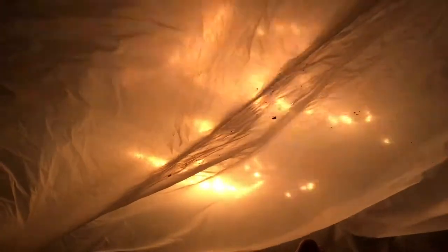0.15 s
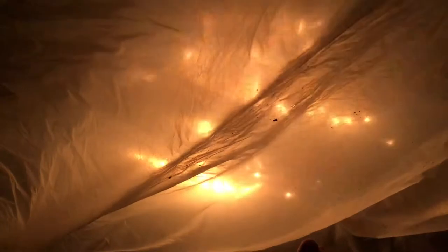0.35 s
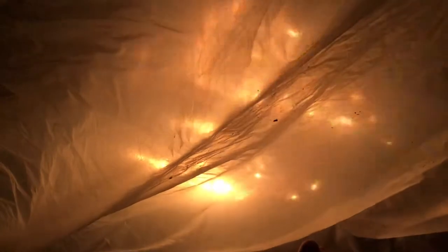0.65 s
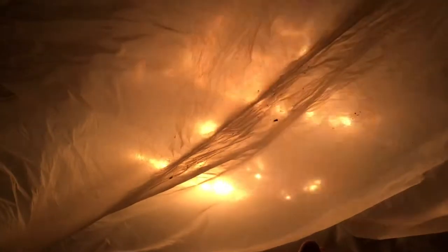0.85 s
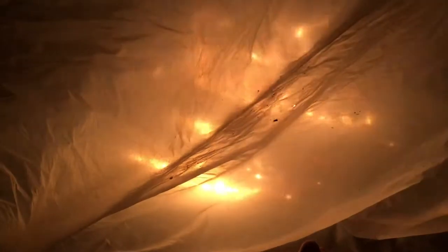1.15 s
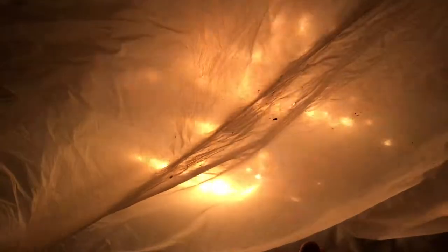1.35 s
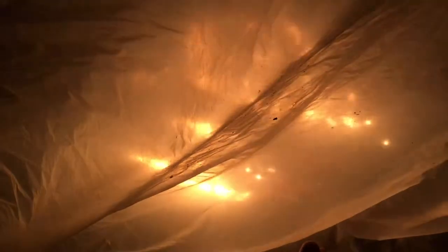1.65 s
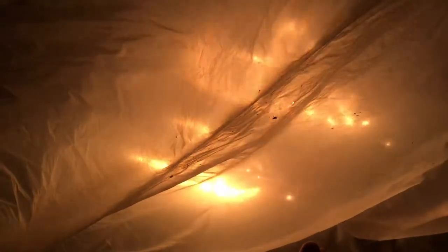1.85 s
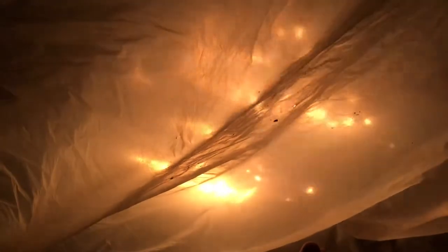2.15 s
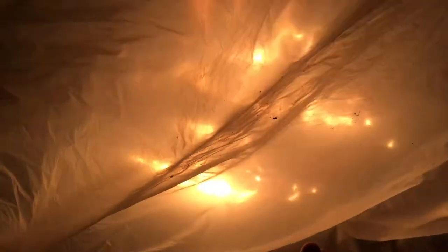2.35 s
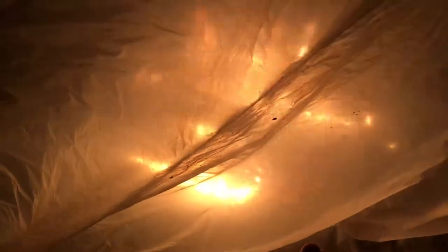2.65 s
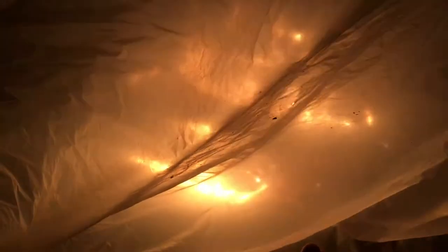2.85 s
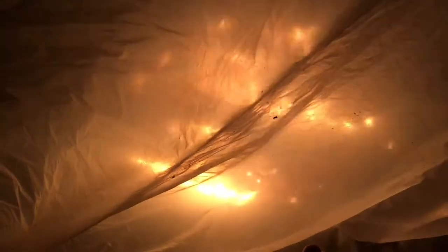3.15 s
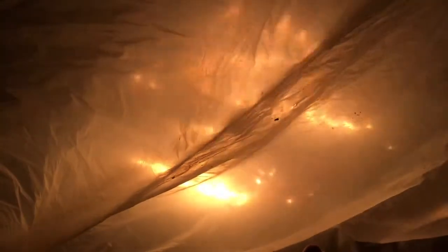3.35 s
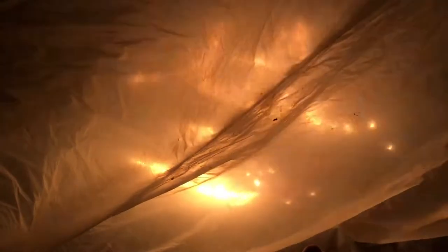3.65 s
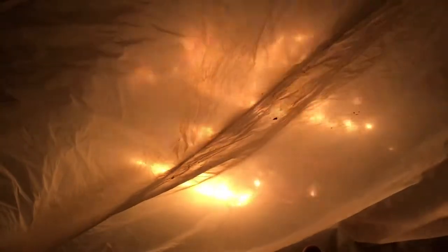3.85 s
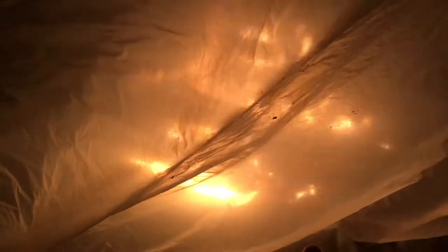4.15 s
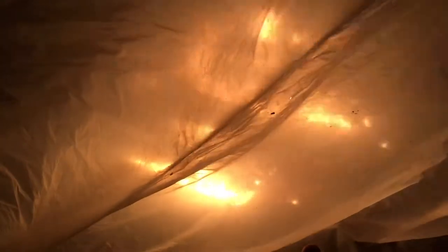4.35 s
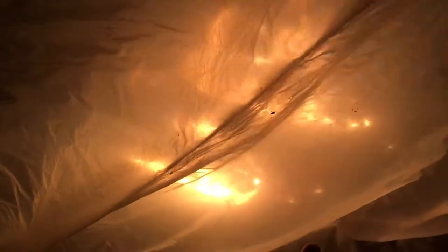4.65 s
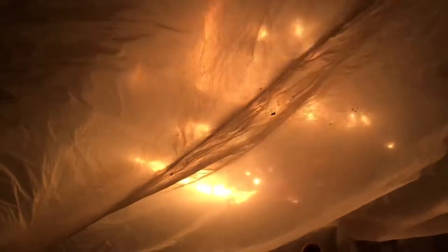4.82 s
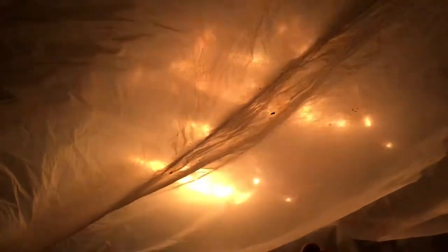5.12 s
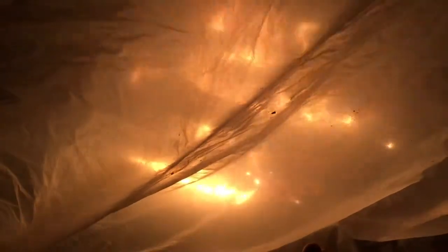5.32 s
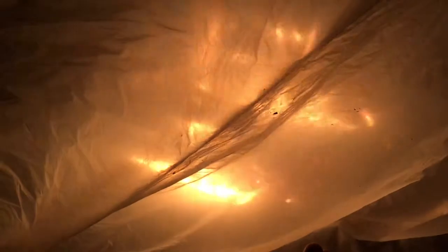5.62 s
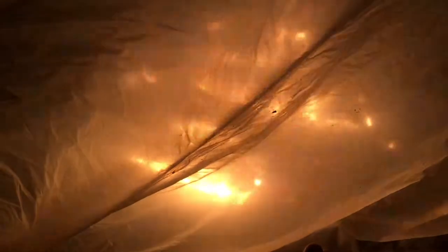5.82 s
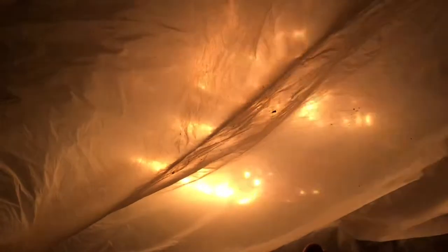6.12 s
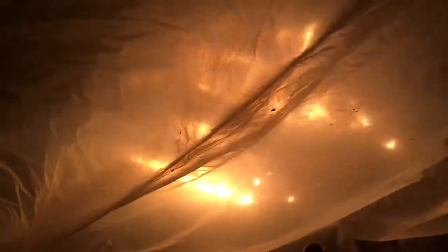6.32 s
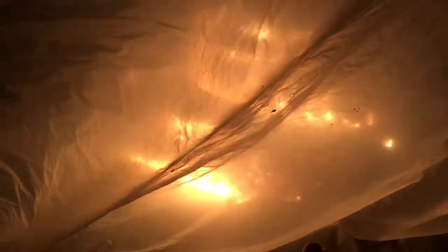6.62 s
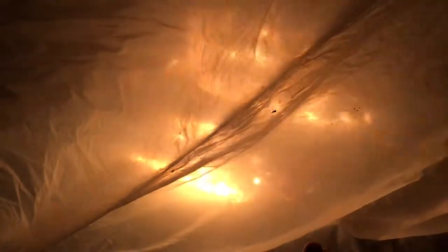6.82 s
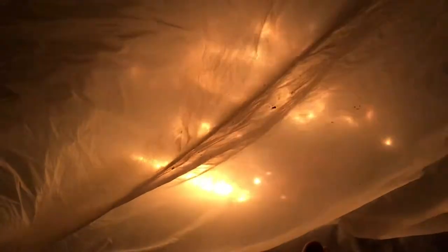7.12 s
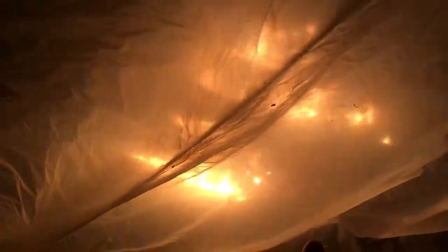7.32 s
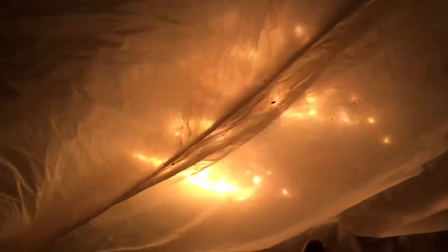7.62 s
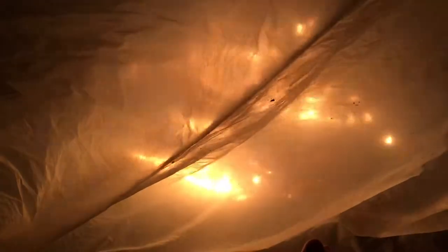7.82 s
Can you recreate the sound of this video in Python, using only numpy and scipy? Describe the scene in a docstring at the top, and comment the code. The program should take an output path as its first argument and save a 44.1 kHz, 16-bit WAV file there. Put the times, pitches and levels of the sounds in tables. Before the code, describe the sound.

Steady rain beats on loose plastic overhead, a low muffled drumming under light patter and spray. Beside it a wood fire gives tiny ticks, two bright snaps in the first three seconds, a duller one around five, then a burst of hard cracks between six and just past seven seconds. Heavy drops thud briefly. Close microphone under the sheet, outdoors, with hardly any echo.

```python
"""Hard, steady rain on a slack plastic sheet, heard from underneath: random impacts drum low,
drops ring short patches of sheet as patter, dense impulses hiss as spray, and heavy drops slap.
A wood fire close by ticks and now and then pops sharply: filtered snaps with noise debris.
The shelter answers pops and heavy drops briefly, by convolution with decaying noise."""
import sys
import numpy as np
from scipy import signal
from scipy.fft import rfft, irfft
from scipy.io import wavfile
from scipy.ndimage import map_coordinates

SR = 44100
rng = np.random.default_rng(int(sys.argv[2]) if len(sys.argv) > 2 else 0)


def pcm_store(signal):
    """Save signal as 16-bit PCM."""
    levels = np.round(np.clip(np.atleast_2d(signal), -1, 1) * 32767)
    wavfile.write(sys.argv[1], SR, levels.astype(np.int16).T)


N = 351477  # length [samples]

# Strength of the rain, before the trims in rain():
# (time [s], drumming level [dB], patter and spray level [dB])
RAIN_STRENGTH = [(0.0, -47.5, -56.5), (1.13, -48, -57), (1.24, -48.5, -55.5), (2.66, -47.5, -56.5),
                 (3.35, -50, -56.5), (3.93, -46.5, -56), (4.95, -48.5, -57), (5.37, -48.5, -56),
                 (6.44, -48, -56.5), (7.97, -48.5, -56.5)]
# Drumming of the slack sheet, relative: (frequency [Hz], gain [dB])
DRUM_SPECTRUM = [(15, -62.5), (25, -39.5), (32, -20.5), (41, -8.5), (61, 0.5), (110, 1.5), (190, -1),
                 (270, -5), (305, -7), (340, -16), (395, -10), (480, -18.5), (700, -41.5), (1500, -53)]
# Patter of drops on plastic, relative: (frequency [Hz], gain [dB])
PATTER_SPECTRUM = [(30, -55.5), (150, -25.5), (400, -1), (600, -2), (1150, 2.5), (2200, -2), (3500, -7.5),
                   (6000, -19.5), (10000, -39), (16000, -26)]
# Fine spray and distant rain, relative: (frequency [Hz], gain [dB])
SPRAY_SPECTRUM = [(30, -55.5), (200, -12), (600, 8), (2000, 2), (4000, -4), (6000, -10), (9000, -14),
                  (11500, -19), (14400, -17.5), (16000, -29.5)]
# Thin ticks of the embers, relative: (frequency [Hz], gain [dB])
EMBER_SPECTRUM = [(100, -53.0), (1000, -15.0), (4000, 5.0), (9000, 2.5), (15000, 0.0)]
# Pops of the fire, from sharp bursts to small ticks: (time [s], relative level [dB],
# ring [Hz], slope above the ring [dB per octave], sizzle at the very top [dB])
FIRE_POPS = [(0.2728, -21, 1530, -0.5, -10), (0.575, -30.5, 3100, 0, -4), (0.8852, -32, 4700, 3, -6),
             (1.211, -20, 2200, 0, -9), (1.3907, -28, 5000, 0, 10), (1.7582, 2.5, 3130, -4.5, 4.5),
             (2.7532, -3, 2110, -4.5, 16.5), (3.1671, -35, 8500, -4.5, -5), (3.366, -33, 4300, -5, 12),
             (3.5501, -24, 6100, -6, 5), (3.6622, -26, 4000, -3, -13), (3.8234, -33.5, 9000, -1.5, 7),
             (4.448, -24.5, 5800, -3, -4), (4.4606, -20.5, 2300, -3, -3), (4.818, -28.5, 4100, 0, 5),
             (5.0123, -33.5, 10400, -3.5, -4), (5.2078, -9.3, 2150, -10, 0), (6.352, 9, 5170, -0.2, 0),
             (6.4624, -2.2, 3100, -3, 1.5), (6.6156, -23.5, 1520, -4, 4), (6.7198, -25, 2600, -2, 7),
             (6.9716, 5, 1770, -3, 6), (7.1847, 3, 2860, 0, -6)]
# Colour common to all pops, relative: (frequency [Hz], gain [dB])
POP_SPECTRUM = [(100, -9.5), (300, -0.5), (800, 2.5), (1300, -2), (1800, 2.5), (3100, 4.5), (3900, 2),
                (5000, 3.5), (6400, -0.5), (9000, 1), (11500, -4), (14500, 1.5), (16000, -18.5)]
# Treble splinters and scatters most: (frequency [Hz], debris gain [dB])
DEBRIS_SPECTRUM = [(700, -5.5), (2300, -6.5), (5600, -0.5), (12000, 1.0)]
# Decay of the shelter's answer: (frequency [Hz], time to fall 60 dB [s])
SHELTER_DECAY = [(200, 0.099), (2000, .16), (8000, 0.21), (16000, 0.094)]
# Heavy drops on the sheet: (time [s], energy [dB])
HEAVY_DROPS = [(0.44, -25.5), (0.853, -22), (1.0915, -11), (1.095, -15.5), (1.3484, -17), (1.8629, -22),
               (1.9793, -24.5), (3.7529, -22), (4.177, -22), (5.3505, -26), (5.4964, -21.5),
               (5.5512, -23.5), (5.7218, -22.5), (6.2283, -21), (7.5433, -26.5), (7.7574, -21.5)]
# Slap that all heavy drops share, relative: (frequency [Hz], gain [dB])
SLAP_SPECTRUM = [(60, -9), (280, 0.5), (800, 1), (2600, -5), (5500, -19.5), (8000, -24), (14000, -39)]

# Pockets ringing above this pitch are too small to give much bass;
# the thinning is in dB per octave, for each octave the pitch is higher
SMALL_POCKET_HZ, THINNING_DB = 2920, 11
SIZZLE_HZ = 10850  # where the sizzle begins
TOP_HZ = 16200  # upper band limit


def amp(db):
    """Level law: decibels to amplitude gain."""
    return 10 ** (np.asarray(db) / 20)


def unit(x):
    """Normalisation: x at rms 1."""
    return x / np.sqrt(np.mean(x ** 2) + 1e-20)


def along(points, hz):
    """Logarithmic frequency scale: (Hz, value) points joined linearly on it."""
    f, v = np.transpose(points)
    return np.interp(np.log(hz + 1), np.log(f + 1), v)


def curves(rows):
    """Linear interpolation: one value per sample for each column after the time."""
    s, *cols = np.transpose(rows)
    return [np.interp(np.arange(N) / SR, s, c) for c in cols]


def wobble(rate):
    """Band-limited fluctuation: a smooth random curve with rate knots a second."""
    knots = rng.standard_normal(int(N * rate / SR) + 4)
    return map_coordinates(knots, [np.arange(N) * rate / SR])


def causal(log_gain):
    """Minimum phase by folding the cepstrum: causal response with this natural-log gain."""
    cepstrum = irfft(log_gain)
    half = len(cepstrum) // 2
    cepstrum[1:half] *= 2
    cepstrum[half + 1:] = 0
    return np.exp(rfft(cepstrum))


def response(shape_db):
    """Energy normalisation: the causal response of energy 1 with this dB shape on the FFT grid."""
    return causal(np.log(unit(amp(shape_db))))


def coloured(x, spectrum):
    """Linear filtering: x through a causal filter with the (Hz, dB) spectrum, at rms 1."""
    hz = np.fft.rfftfreq(8192, 1 / SR)
    kernel = irfft(causal(np.log(amp(along(spectrum, hz)))))
    return unit(signal.fftconvolve(x, kernel)[:N])


def burst(envelope):
    """Transient noise: random samples under an envelope, with energy 1."""
    x = envelope * rng.standard_normal(len(envelope))
    return x / np.linalg.norm(x)


def add(track, s, x):
    """Superposition: mix x into the track from time s [s] on."""
    part = track[max(0, round(s * SR)):][:len(x)]
    part += x[:len(part)]


def impacts(rate, spread_db):
    """Shot noise: blows at random times, rate a second, of capped log-normal size."""
    size_db = spread_db * np.minimum(rng.standard_normal(N), 2)
    return (rng.random(N) < rate / SR) * amp(size_db) * rng.choice([-1, 1], N)


def splats(rate, spread_db, cycles, splash_t60, splash_db, count=5):
    """Modal excitation: each blow rings a few short random modes, then splashes as decaying noise."""
    blows = impacts(rate, spread_db)
    at = np.flatnonzero(blows)
    t = np.arange(SR // 150) / SR
    low_hz, high_hz = 450, 11000
    ring = np.zeros((len(at), len(t)))
    for k in range(count):
        chance = rng.random((len(at), 2))
        hz = low_hz * (high_hz / low_hz) ** ((k + chance[:, :1]) / count)
        # high modes die sooner and start stronger
        strength = chance[:, 1:] * hz
        ring += strength * np.sin(2 * np.pi * hz * t) * np.exp(-hz * t / cycles)
    ring *= blows[at, None]
    positions = at[:, None] + np.arange(len(t))
    rings = np.bincount(positions.ravel(), ring.ravel(), N)[:N]
    fade = amp(-60 * np.arange(SR // 10) / SR / splash_t60)
    # the energies of overlapping splashes add
    splash_energy = np.abs(signal.fftconvolve(blows ** 2, fade ** 2)[:N])
    splash = np.sqrt(splash_energy) * rng.standard_normal(N)
    return unit(rings) + amp(splash_db) * unit(splash)


def rain():
    """Superposed random impacts: drops push the slack sheet, slap its surface and break into spray."""
    drum_db, patter_db = curves(RAIN_STRENGTH)
    flurry = wobble(7.7)  # shared by drumming and patter
    pushes = impacts(rate=900, spread_db=3)
    drum = amp(drum_db + 1.5 + .5 * flurry) * coloured(pushes, DRUM_SPECTRUM)
    slaps = splats(rate=400, spread_db=5, cycles=2.6, splash_t60=.05, splash_db=-1)
    patter = amp(patter_db - 1.3 + 0.33 * flurry) * coloured(slaps, PATTER_SPECTRUM)
    fizz = impacts(rate=6000, spread_db=0)
    spray = amp(patter_db - 3.0 + 1.5 * wobble(12)) * coloured(fizz, SPRAY_SPECTRUM)
    return drum + patter + spray


def embers():
    """Sparse modal excitation: faint thin ticks of the embers between the pops."""
    ticks = splats(rate=18, spread_db=3.3, cycles=2, splash_t60=.04, splash_db=0)
    return amp(-76) * coloured(ticks, EMBER_SPECTRUM)


def pocket(hz, ring_hz, treble_slope_db, sizzle_db, ring_db=4.0, ring_octaves=.19,
           hollow_db=4, hollow_octaves=1.2, hollow_width=0.31, body_octaves=0.97):
    """Cavity resonance: a ring, a hollow about an octave below, less bass if small, sizzle on top."""
    octaves = np.log2((hz + 1) / ring_hz)
    ring = ring_db * np.exp(-(octaves / ring_octaves) ** 2)
    hollow = hollow_db * np.exp(-((octaves + hollow_octaves) / hollow_width) ** 2)
    smallness = max(0, np.log2(ring_hz / SMALL_POCKET_HZ))  # octaves
    bass = THINNING_DB * smallness * np.minimum(octaves + body_octaves, 0)
    treble = treble_slope_db * np.maximum(octaves, 0)
    sizzle = sizzle_db / (1 + (SIZZLE_HZ / (hz + 1)) ** 8)
    return bass - hollow + ring + treble + sizzle


def fire(splinter_t60=0.0086, snap_db=-2.5, splinter_db=-3.5, scatter_db=-8.5,
         lag_cycles=1.293, knee_hz=200, scatter_t60=0.047, size=8192):
    """Impulsive release: pockets in the wood burst with a snap, splinters, then nearby scatter."""
    out = np.zeros(N)
    t, hz = np.arange(size) / SR, np.fft.rfftfreq(size, 1 / SR)
    splinters = (1 - np.exp(-t / 0.00022)) * amp(-60 * t / splinter_t60)
    scatter = (1 - np.exp(-t / .003)) * amp(-60 * t / scatter_t60)
    # low notes arrive last: a quick downward chirp
    chirp = np.exp(-2j * np.pi * lag_cycles * np.log1p(hz / knee_hz))
    bright = amp(along(DEBRIS_SPECTRUM, hz))
    for s, db, ring_hz, treble_slope_db, sizzle_db in FIRE_POPS:
        shape_db = along(POP_SPECTRUM, hz) + pocket(hz, ring_hz, treble_slope_db, sizzle_db)
        colour = amp(db) * response(shape_db)
        debris = amp(splinter_db) * burst(splinters) + amp(scatter_db) * burst(scatter)
        pop = colour * chirp * (amp(snap_db) + bright * rfft(debris))
        add(out, s, irfft(pop))
    return out


def shelter(x):
    """Diffuse reverberation: a short answer from the sheet and the ground, its decay set by pitch."""
    hz, t, z = signal.stft(rng.standard_normal(SR // 4), SR, nperseg=256)
    decay = amp(-60 * t / along(SHELTER_DECAY, hz)[:, None])
    tail = signal.istft(z * decay, SR, nperseg=256)[1]
    return signal.fftconvolve(x, tail / np.linalg.norm(tail))[:N]


def heavy_drops(slap_t60=0.03, lag_cycles=2.53, knee_hz=300, size=2048):
    """Dispersion: fat drops slap the sheet with dull bursts; low notes cross it more slowly."""
    out = np.zeros(N)
    t, hz = np.arange(size) / SR, np.fft.rfftfreq(size, 1 / SR)
    slap = (1 - np.exp(-t / 0.00026)) * amp(-60 * t / slap_t60)
    dispersion = np.exp(-2j * np.pi * lag_cycles * np.log1p(hz / knee_hz))
    colour = response(along(SLAP_SPECTRUM, hz)) * dispersion
    for s, db in HEAVY_DROPS:
        add(out, s, amp(db) * irfft(rfft(burst(slap)) * colour))
    return out


def scene():
    """Superposition: rain overhead, the fire beside the shelter, and the shelter's answer."""
    near = fire() + heavy_drops()
    return (rain() + embers() + near + amp(-25.5) * shelter(near))[None]


def record(dry):
    """Soft saturation and band limiting: the very highest peaks are rounded, the top cut off."""
    rounded = dry / (1 + np.abs(dry / .72) ** 8) ** (1 / 8)
    low_pass = signal.ellip(10, .1, 90, TOP_HZ, fs=SR, output="sos")
    return signal.sosfilt(low_pass, rounded)


dry = scene()
out = record(dry)
pcm_store(out)
```